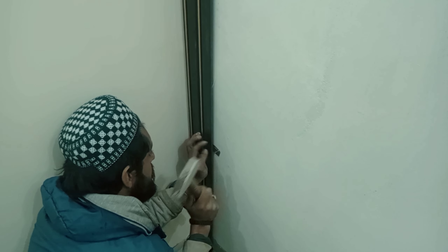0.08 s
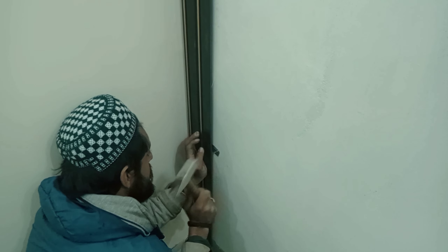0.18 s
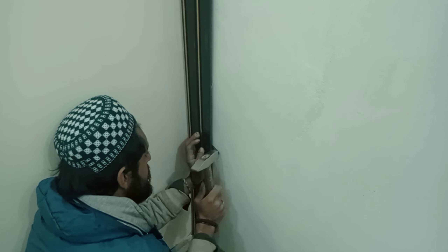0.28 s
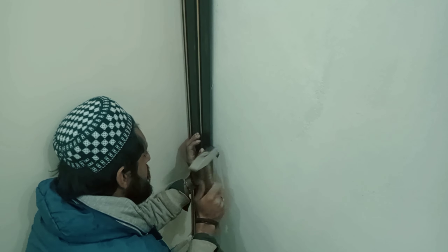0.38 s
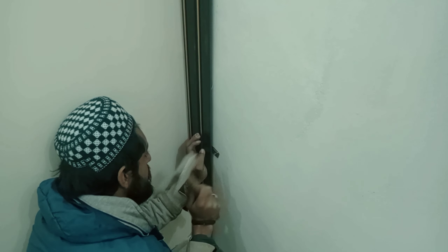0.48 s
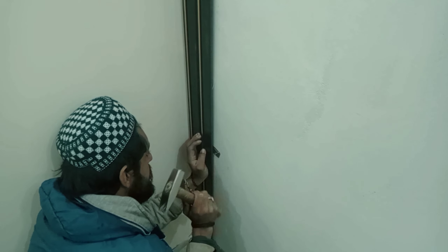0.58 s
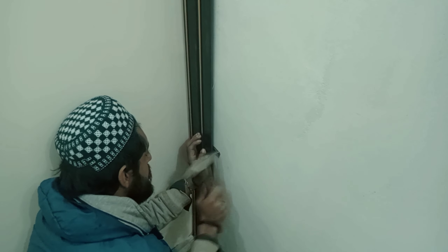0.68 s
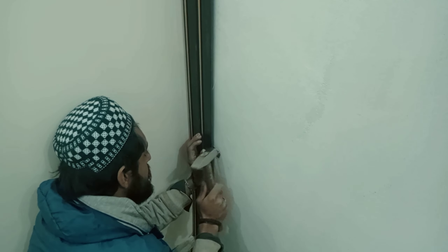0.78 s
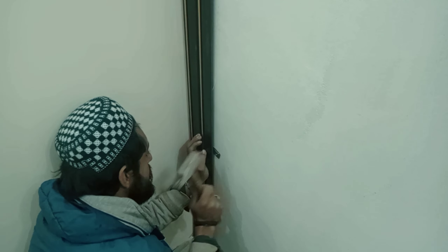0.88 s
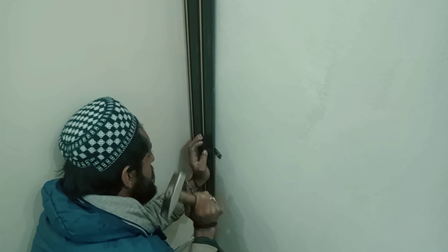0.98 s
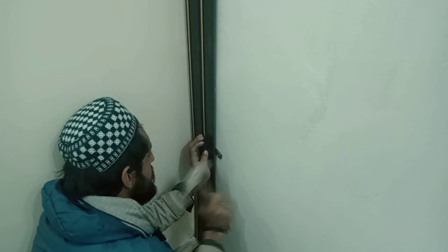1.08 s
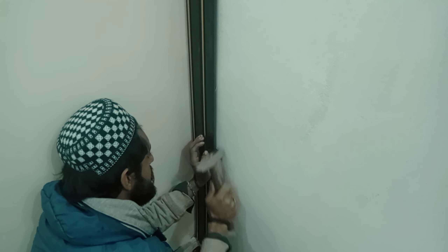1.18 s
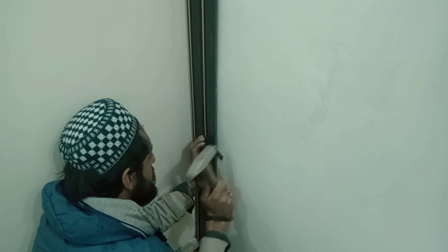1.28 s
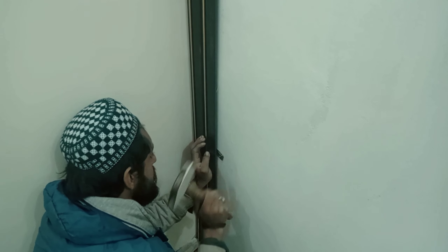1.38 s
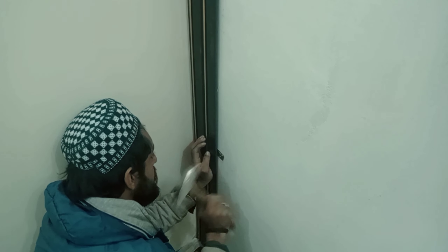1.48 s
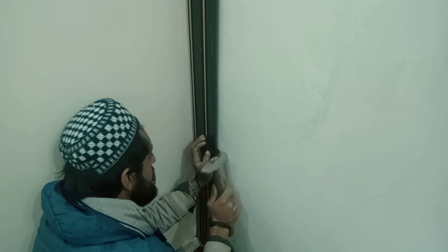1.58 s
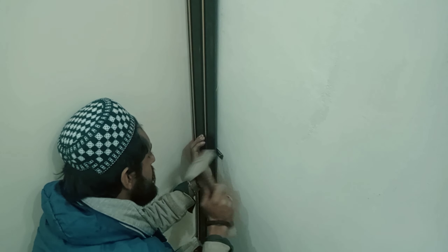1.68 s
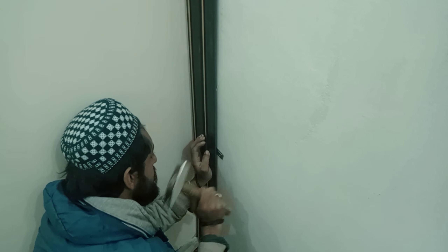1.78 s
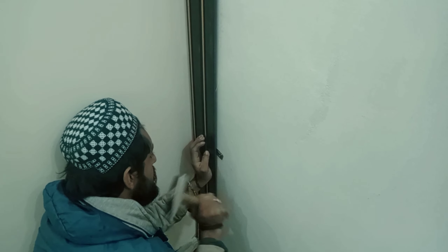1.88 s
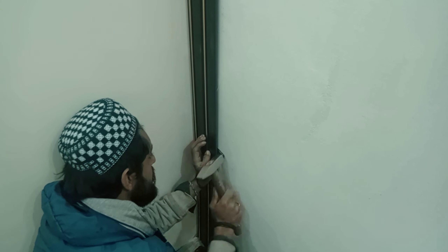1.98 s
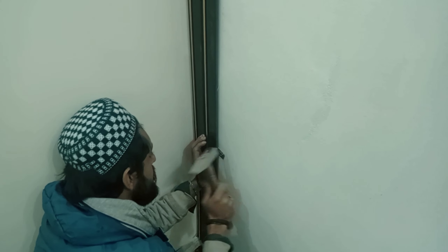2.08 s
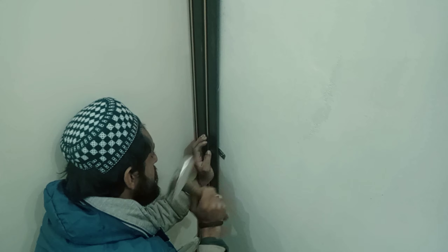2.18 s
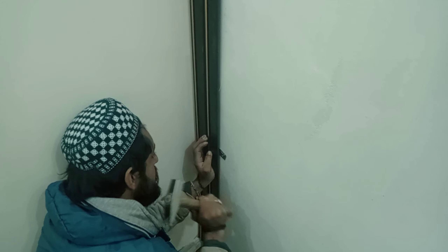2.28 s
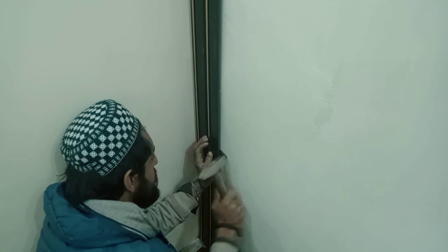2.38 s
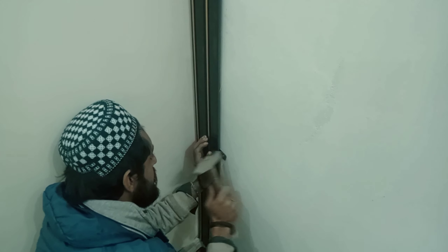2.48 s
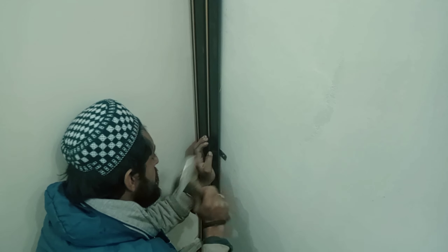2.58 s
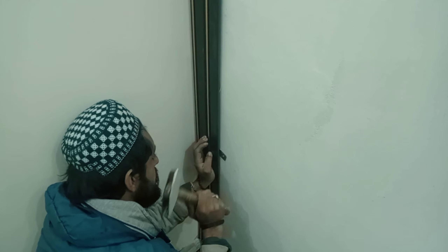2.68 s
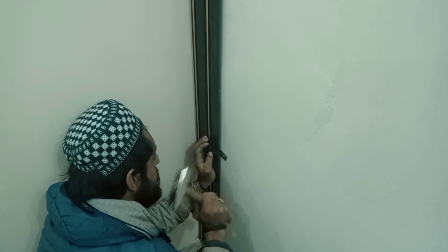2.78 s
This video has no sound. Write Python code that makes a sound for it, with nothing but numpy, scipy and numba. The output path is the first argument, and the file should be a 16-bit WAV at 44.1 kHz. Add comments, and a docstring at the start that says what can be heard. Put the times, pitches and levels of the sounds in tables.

```python
"""The echo of an earlier hammer blow is dying away in a bare, hard room, over a faint hush.
Six blows then drive a nail through a panel strip into a wall, with light taps in between.
Each blow is a short steel ring, a crack and a thud, and the room carries it on for about a second.
A phone a couple of metres away turns its level down just before each blow and lets go slowly.
At the very end the level starts to dip for a blow that falls just after it."""
import sys
import numpy as np
from scipy import signal
from scipy.fft import rfft, irfft
from scipy.io import wavfile
from scipy.ndimage import uniform_filter1d, minimum_filter1d
from numba import njit

SR = 44100
rng = np.random.default_rng(int(sys.argv[2]) if len(sys.argv) > 2 else 0)


def wav_record(signal):
    """Record a signal, one row per channel, as 16-bit PCM in the file named by sys.argv[1]."""
    frames = np.transpose(np.atleast_2d(signal))
    bounded = np.clip(frames, -1, 1)
    # unit amplitude maps onto the largest positive 16-bit level
    quanta = np.round(bounded * 32767).astype(np.int16)
    wavfile.write(sys.argv[1], SR, quanta)


def decibels_to_gain(level_db):
    """Convert a level in decibels to a linear amplitude gain (20 dB per decade)."""
    exponent = np.asarray(level_db, float) / 20
    return 10 ** exponent


N = 125685

# tones of the hammer head and nail: (frequency [Hz], relative level [dB], time to fall by 60 dB [s])
STEEL = [(3296, -2, 0.016), (3642, -0.5, 0.029), (3951, 2, 0.018), (4403, -10, 0.026), (4670, -15, 0.031),
         (5140, -14, .02), (6570, -50, 0.011), (8290, -13.5, 0.016), (8880, -11, 0.015), (9450, -11, .02),
         (11230, -29, 0.06)]
# where in the spectrum each part of a blow is made louder or softer
THUD_TOP_HZ, PANEL_HZ, STEEL_HZ, TREBLE_HZ = 740, 2310, 3600, 7000
# extra time worked out before the start and after the end, then cut away
LEAD_S, TRAIL_S = 0.3, 0.05


def colour(x, points):
    """Make parts of the spectrum louder or softer, following (Hz, dB) points."""
    hz, db = np.array(points, float).T
    f = np.arange(len(x) // 2 + 1) * SR / len(x) + 1  # 1 Hz up, so that the logarithm exists
    gain = decibels_to_gain(np.interp(np.log(f), np.log(hz), db))
    return irfft(rfft(x) * gain, len(x))


def bumps(x, peaks):
    """Lift the spectrum around resonances given as (Hz, dB, width in Hz)."""
    f = np.arange(len(x) // 2 + 1) * SR / len(x)
    power = 1
    for hz, db, width in peaks:
        power = power + (decibels_to_gain(2 * db) - 1) / (1 + (2 * (f - hz) / width) ** 4)
    return irfft(rfft(x) * np.sqrt(np.maximum(power, 0.01)), len(x))


def ring(modes, t, chance, hold=0.0):
    """Struck objects sound as sines that hold, then decay; chance shifts their level, pitch and phase."""
    total = 0
    for (hz, db, t60), (louder, sharper, phase) in zip(modes, chance):
        tone = np.sin(2 * np.pi * (hz * (1 + 0.0041 * sharper) * t + phase))
        decay = decibels_to_gain(-60 * np.maximum(t - hold, 0) / max(t60, 0.003))
        total = total + decibels_to_gain(db + 1.64 * louder) * tone * decay
    return total


def add(out, x, start, db):
    """Mix a sound in at a time in seconds."""
    i = int((start + LEAD_S) * SR)
    out[i:i + len(x)] += decibels_to_gain(db) * x[:len(out) - i]


def hush(length):
    """A faint steady hush: noise, strongest from 120 to 503 Hz."""
    noise = colour(rng.standard_normal(length), [(40, -20), (120, 0), (503, 0), (4000, -10), (9000, -30)])
    return decibels_to_gain(-64) * noise / noise.std()


def room(thud_db, panel_db, treble_db, knock_hz, knock_db, middle_db, bass_db, ring_hz, ring_db,
         low_shimmer_hz, low_shimmer_db, high_shimmer_hz, high_shimmer_db):
    """Dense reflections build up, bass last, and die band by band; a few standing waves boom on."""
    # colour of the reverberation: (frequency [Hz], relative level per hertz [dB])
    room_colour = [(24, -49), (40, -19.5), (199, 1.5), (305, -4.5), (354, -4), (433, -1.5), (615, -6),
                   (1120, -11), (1240, -15), (2440, -4), (2630, 0), (3650, -1), (4240, -9), (5720, -21),
                   (9450, -19.5), (14800, -37.5), (16000, -36)]
    # reverberation time: (frequency [Hz], time to fall by 60 dB [s])
    room_t60 = [(60, 1.07), (160, 1.18), (420, 0.96), (1100, 0.92), (2900, 0.71), (5000, 0.65),
                (8000, 0.61), (14000, 0.35)]
    # standing waves between the walls: (frequency [Hz], relative level [dB], time to fall by 60 dB [s])
    room_modes = [(122.6, -33.5, 1.46), (130.3, -35.5, 1.16), (188.7, -33, 0.71), (204, -40, 1.1),
                  (249, -34.5, 1.31), (304.6, -27, 0.59)]
    build_s, bass_build_s = 0.0098, 0.025
    clump_db, clump_s, mixing_s = 1.5, 0.005, 0.2
    t = np.arange(int(1.5 * SR)) / SR

    # noise stands for thousands of reflections, coloured by the room and by this blow
    noise = colour(rng.standard_normal(len(t)), room_colour)
    gains = [(295, bass_db), (THUD_TOP_HZ, thud_db), (1570, middle_db), (PANEL_HZ, panel_db),
             (STEEL_HZ, 0), (TREBLE_HZ, treble_db)]
    noise = colour(noise / noise.std(), gains)
    resonances = [(hz, 2, 67) for hz, _, _ in STEEL]
    resonances += [(knock_hz, knock_db, 340), (ring_hz, ring_db, 100),
                   (low_shimmer_hz, low_shimmer_db, 380), (high_shimmer_hz, high_shimmer_db, 380)]
    spectrum = rfft(bumps(noise, resonances))

    # overlapping bands, three to the octave from 40 Hz up, each with its own build-up and decay
    place = 3 * np.log2(np.arange(len(spectrum)) * SR / len(t) / 40 + 1e-9)
    hz, t60 = np.array(room_t60).T
    reflections = 0
    for k in range(27):
        f = 40 * 2 ** (k / 3)
        band = irfft(spectrum * np.clip(1 - abs(place - k), 0, 1), len(t))
        swell = 1 - np.exp(-t / (build_s + bass_build_s * 100 / f))
        decay = decibels_to_gain(-60 * t / np.interp(np.log(f), np.log(hz), t60))
        reflections = reflections + band * swell * decay

    # early reflections come in clumps until the room has mixed them
    clumps = np.interp(t / clump_s, np.arange(2000), rng.standard_normal(2000)) * np.exp(-t / mixing_s)
    boom = ring(room_modes, t, rng.standard_normal((len(room_modes), 3)))
    boom = boom * (1 - np.exp(-t / bass_build_s))
    return decibels_to_gain(-16.5 + clump_db * clumps) * reflections + decibels_to_gain(bass_db) * boom


def strike(thud_db, panel_db, treble_db, knock_hz, knock_db, contact_s):
    """The panel knocks first; steel and a broad crack swell and hold through the contact."""
    # tones of the panel strip: (frequency [Hz], relative level [dB], time to fall by 60 dB [s])
    panel_modes = [(231, -24.5, 0.017), (612, -28.5, 0.068), (1000, -35.5, 0.013), (1661, -33, 0.063),
                   (2197, -29.5, 0.06), (2460, -29.5, 0.038), (2874, -27.5, 0.037)]
    rise_s, thud_lead_s, crack_t60_s = 0.0013, 0.00058, 0.036
    t = np.arange(SR // 8) / SR
    chance = rng.standard_normal((len(STEEL) + len(panel_modes) + 1, 3))

    crack_decay = decibels_to_gain(-60 * np.maximum(t - contact_s, 0) / crack_t60_s)
    crack = decibels_to_gain(-15.5) * rng.standard_normal(len(t)) * crack_decay
    steel = decibels_to_gain(-10.5) * ring(STEEL, t, chance, contact_s)
    swell = 1 - np.exp(-(np.maximum(t - thud_lead_s, 0) / rise_s) ** 2)
    panel = ring(panel_modes, t, chance[len(STEEL):], contact_s)
    panel = panel * (1 - np.exp(-(t / thud_lead_s) ** 2))
    # the knock always starts at the same phase
    knock = ring([(knock_hz, knock_db, 0.02)], t, chance[-1:] * [1, 1, 0], contact_s / 2)

    sound = np.pad(swell * (steel + crack) + panel - knock, 256)
    gains = [(THUD_TOP_HZ, thud_db), (PANEL_HZ, panel_db), (STEEL_HZ, 0), (TREBLE_HZ, treble_db),
             (12000, treble_db - 12), (16000, treble_db - 30)]
    fade_out = np.clip(8 - 64 * t, 0, 1)
    return decibels_to_gain(8.5) * colour(sound, gains)[256:-256] * fade_out


@njit
def release(x, fall):
    """Follow peaks at once, then sink slowly."""
    envelope, level = np.empty(len(x)), 0.0
    for i in range(len(x)):
        level = max(x[i], level * fall)
        envelope[i] = level
    return envelope


def limiter(x):
    """The phone's limiter: gain falls ahead of each peak and recovers as the level sinks."""
    threshold_db, ratio = -18, 1.68
    ahead_s, slew_s, release_s = 0.017, 0.008, 0.1
    loudness = np.sqrt(uniform_filter1d(x ** 2, size=256) + 1e-12)
    envelope = release(loudness, np.exp(-1 / (release_s * SR)))
    gain = np.minimum(1, decibels_to_gain(threshold_db) / envelope) ** (1 - 1 / ratio)
    # take the lowest gain of the moments to come, then smooth it
    ahead = int(ahead_s * SR)
    gain = minimum_filter1d(gain, ahead, origin=-(ahead // 2))
    gain = uniform_filter1d(gain, int(slew_s * SR))
    return x * gain * decibels_to_gain(2.5)


def scene():
    """Blows with their room, light taps without it and a faint hush, as the limiter passes them."""
    # blows, the first before the start and the last just after the end:
    # (time [s], level [dB], thud [dB], panel [dB], treble [dB])
    blows = [(-.27, -11, 10.5, 4, -8), (0.1986, -3.5, 3.5, 1, -2), (0.6436, -5.5, 2.5, 1, 2.5),
             (1.076, 3, 5, 2.5, 0.5), (1.5032, 1, -2, -3, 2.5), (1.939, 2.5, 0, -0.5, 1.5),
             (2.357, 2.5, -1, 4, 1.5), (2.868, 29, 6, 14, -4)]
    # what each blow wakes in the panel, as the room carries it; the direct knock shares the frequency:
    # (knock frequency [Hz], knock [dB], middle [dB], bass [dB])
    voicings = [(800, 1, 8, 6.5), (1027, 5, -1.5, 4), (920, 6.5, 2, 5), (760, -3, -1.5, -2.5),
                (632, 9.5, 2, 0), (644, 7.5, 1.5, 0.5), (960, 2.5, 3.5, -3.5), (800, 15, 0, 0)]
    # the tone that each blow leaves ringing in the room: (frequency [Hz], lift [dB])
    ringing_tones = [(2780, 5), (2780, 7.5), (3670, 7.5), (3740, 7), (2727, 7), (2725, 6), (2920, 1),
                     (2800, 3)]
    # two bright tones of the head, in the room:
    # (lower frequency [Hz], lift [dB], higher frequency [Hz], lift [dB])
    shimmers = [(7000, 2, 9400, 2), (6900, 3, 9300, 3), (6500, 3, 8300, 3), (7300, 4, 9000, 3),
                (7700, 5, 9400, 3), (7000, 2, 8900, 4), (8250, 5, 9400, 7), (7000, 2, 9400, 2)]
    # how squarely each blow lands: (direct sound [dB], direct knock [dB], contact time [s])
    landings = [(0, -20, .006), (-4, -21, 0.0036), (-4, -18, 0.0039), (-6, -35.5, 0.0045),
                (-2, -15.5, 0.0018), (-5, -12, 0.0036), (-5, -25, 0.0028), (0, -20, .006)]
    # the head rebounds on the nail or touches it: (time [s], level [dB], contact time [s])
    taps = [(0.2227, -8.5, 0.0012), (0.231, -16.5, 0.0043), (.667, -9, 0.00086), (1.0425, -33.5, 0.00045),
            (1.105, -13, 0.0068), (1.526, -18, 0.0035), (1.982, -14, 0.0035), (2.376, -16.5, 0.005)]

    out = np.zeros(N + int((LEAD_S + TRAIL_S) * SR))
    for blow, voicing, ringing, shimmer, landing in zip(blows, voicings, ringing_tones, shimmers, landings):
        start, db, *tone = blow
        direct_db, knock_db, contact_s = landing
        add(out, strike(*tone, voicing[0], knock_db, contact_s), start, db + direct_db)
        add(out, room(*tone, *voicing, *ringing, *shimmer), start, db)
    for start, db, contact_s in taps:
        add(out, strike(-0.27, 0, -5.5, 720, -21, contact_s), start, db)
    out = limiter(out + hush(len(out)))
    first = int(LEAD_S * SR)
    return out[None, first:first + N]


def low_pass(x):
    """Removes everything above the highest recorded frequency."""
    return signal.sosfilt(signal.butter(12, 16550, fs=SR, output="sos"), x)


def record(dry):
    """The phone rounds off the peaks, and its microphone drops the deep bass and the top."""
    x = np.tanh(1.065 * dry) / 1.189
    x = signal.sosfilt(signal.butter(2, 65, "high", fs=SR, output="sos"), x)
    x = signal.sosfilt(signal.ellip(8, 0.5, 40, 15500, fs=SR, output="sos"), x)
    return low_pass(x)


dry = scene()
out = record(dry)
wav_record(out)
```